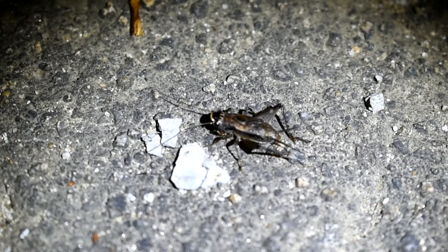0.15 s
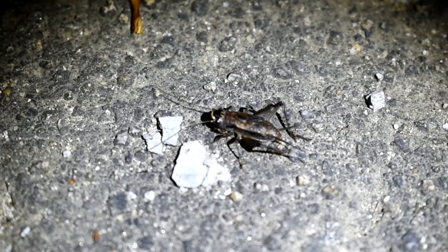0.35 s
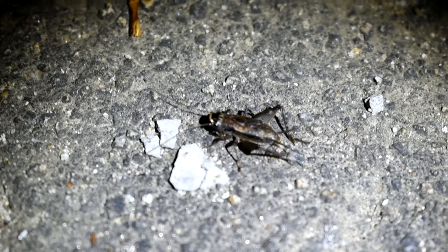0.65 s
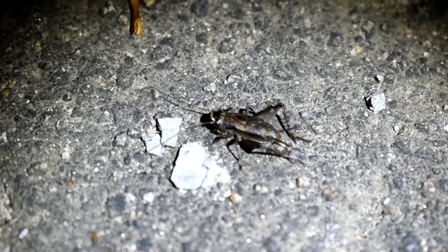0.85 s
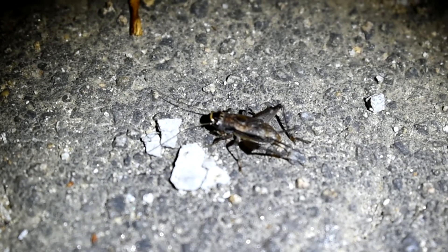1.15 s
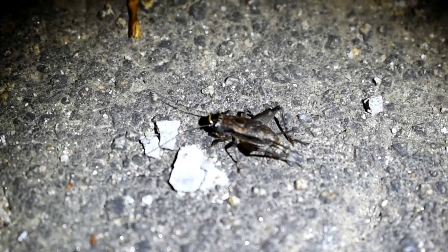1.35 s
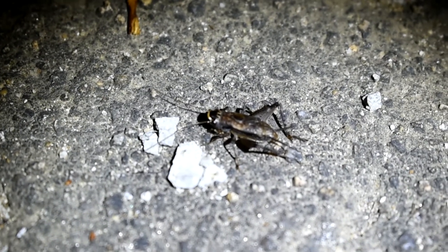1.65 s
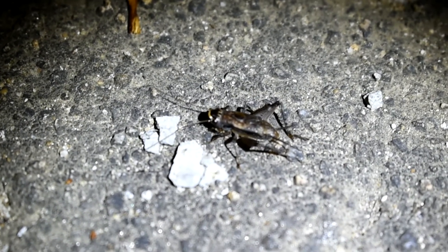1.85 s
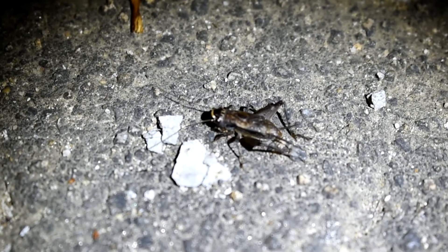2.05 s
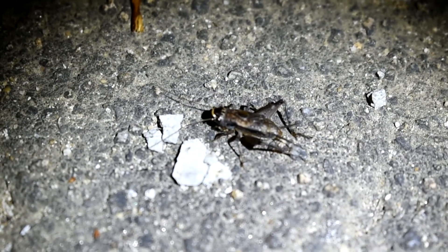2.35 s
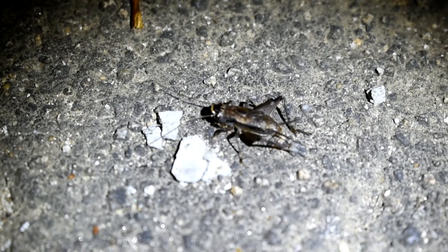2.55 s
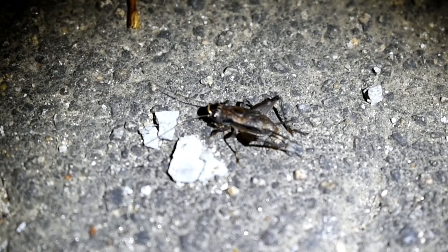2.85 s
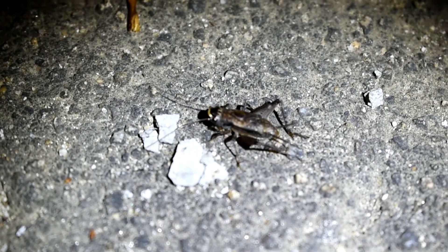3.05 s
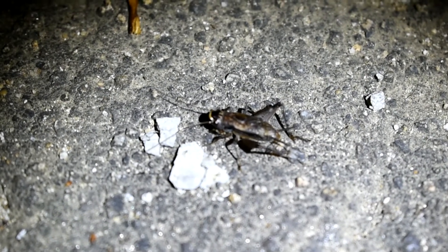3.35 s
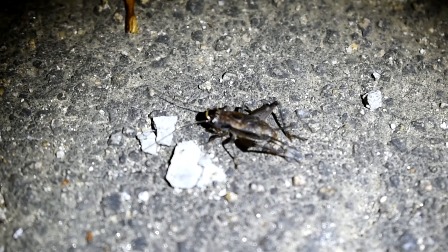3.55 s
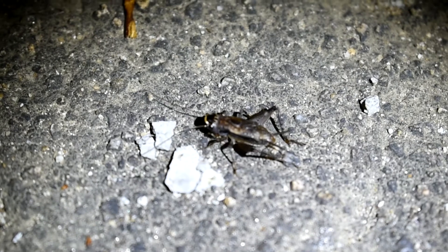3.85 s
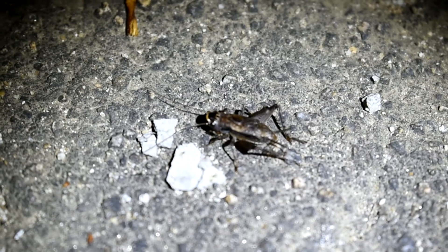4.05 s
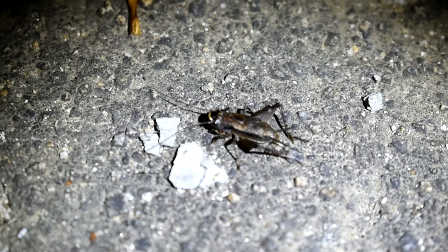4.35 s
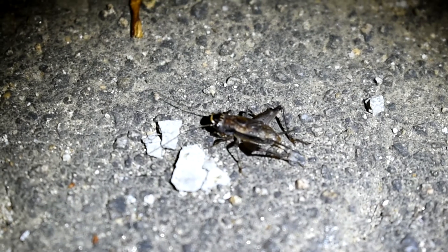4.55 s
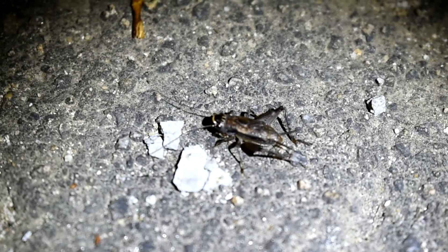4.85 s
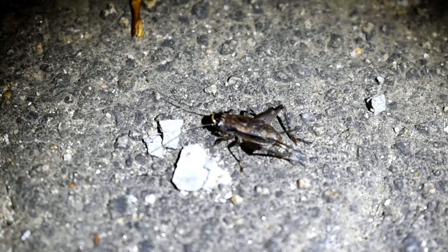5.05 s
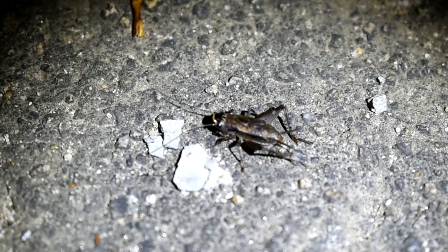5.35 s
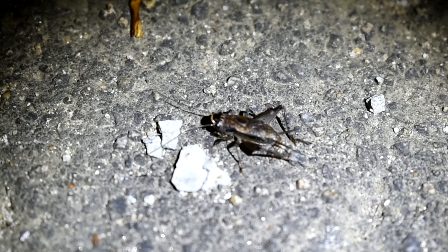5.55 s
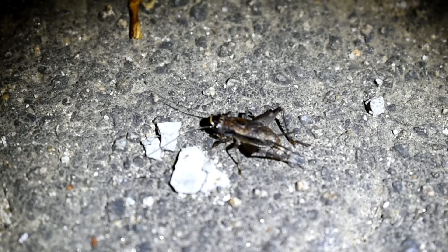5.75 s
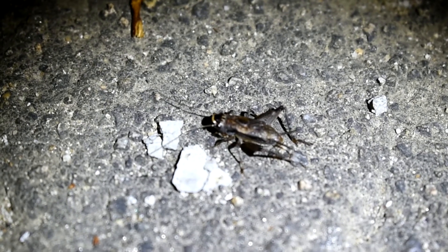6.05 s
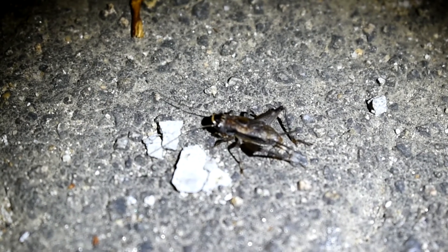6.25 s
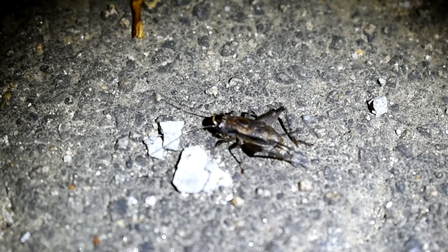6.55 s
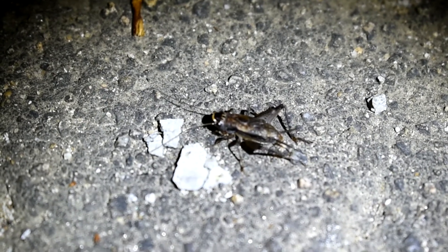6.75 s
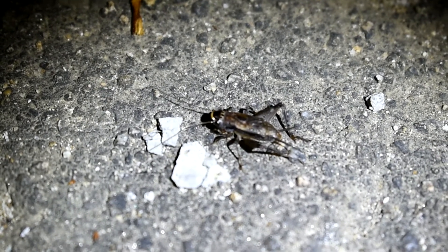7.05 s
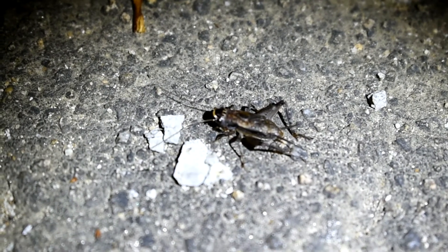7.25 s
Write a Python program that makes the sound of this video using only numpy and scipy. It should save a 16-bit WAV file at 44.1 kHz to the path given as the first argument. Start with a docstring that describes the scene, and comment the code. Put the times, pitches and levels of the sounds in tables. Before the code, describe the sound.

Night outdoors, stereo and thin in the bass. One near cricket dominates with fast, piercing, scratchy chirps, first in even pulses, then in uneven groups of two or three, tightly echoed by ground and wall. Between its three passages, two faint far crickets pulse steadily, mostly left, very high insect buzzes flicker, and one light crack sounds. Soft road noise fades, then rises after the last trill.

```python
"""Night on concrete near a wall. From the start a cricket sings, heard over fixed echoes: each wing stroke is
a falling tone with overtones and a scrape. Two far crickets pulse evenly, tyres and the night are shaped hiss.
The song stops at 0.4 s; katydid buzzes (tooth strikes ringing a broad mode) and a crack of noise at 1.9 s follow.
It returns at 2.0-3.9 s and 4.9-6.7 s, with more buzzes around 4-5 s between and over the songs.
The traffic, softest near 4.2 s, swells to the end."""
import sys
import numpy as np
from scipy import signal
from scipy.fft import rfft, irfft
from scipy.io import wavfile

SR = 44100
rng = np.random.default_rng(int(sys.argv[2]) if len(sys.argv) > 2 else 0)


def log_audio(samples):
    """Write samples as a 16-bit WAV file to the path given in sys.argv[1]."""
    # one column per channel
    frames = np.atleast_2d(samples).T
    # limit to full scale, then quantise
    limited = np.clip(frames, -1, 1)
    pcm = np.round(limited * 32767).astype(np.int16)
    wavfile.write(sys.argv[1], SR, pcm)


N = 327222
TIME = np.arange(N) / SR   # s


def from_db(db):
    """Turn dB into a gain."""
    return 10 ** (np.asarray(db) / 20)


def rms_one(x):
    """Scale to an average (rms) strength of 1."""
    return x / np.sqrt(np.mean(x ** 2) + 1e-20)


def at_hz(points, hz, axis=1):
    """Read a spectrum table between its points, on a log-frequency axis."""
    points = np.array(points)
    return np.interp(np.log(hz + 1), np.log(points[:, 0]), points[:, axis])


def at_time(points):
    """Read a table of levels (dB) at every sample, along straight lines between its points."""
    return np.interp(TIME, *np.transpose(points))


def sides(pan_db):
    """Left and right gains for a level difference: half up on one side, half down on the other."""
    return from_db(np.multiply.outer([0.5, -0.5], pan_db))


def noise(spectrum, pan=((1, 0), (2, 0)), channels=2):
    """Hiss shaped by a spectrum, unrelated in each channel; rms 1 over all channels."""
    hz = np.fft.rfftfreq(N, 1 / SR)
    shape = from_db(at_hz(spectrum, hz)) * sides(at_hz(pan, hz))[:channels]
    white = rng.standard_normal((channels, N))
    return rms_one(irfft(rfft(white) * shape, N))


def filtered(x, order, hz, kind):
    """Keep only the low, the high or a band of frequencies, with a smooth (Butterworth) edge."""
    return signal.sosfilt(signal.butter(order, hz, kind, fs=SR, output="sos"), x)


def resonance(x, hz, width_hz):
    """One mode that x sets ringing; the wider it is, the sooner it dies."""
    r = np.exp(-np.pi * width_hz / SR)
    feedback = [1, -2 * r * np.cos(2 * np.pi * hz / SR), r * r]
    return signal.lfilter([1, 0, -1], feedback, x + 1e-18)


def pulses(per_s, spread_db):
    """An evenly spaced click train with uneven strengths."""
    clicks = np.diff(np.floor(TIME * per_s), prepend=0)
    return clicks * from_db(spread_db * rng.standard_normal(N))


def hump(share, roundness):
    """Rises from 0 to 1 and falls back while share runs from 0 to 1."""
    return np.abs(np.sin(np.pi * np.clip(share, 0, 1))) ** roundness


def cricket():
    """A scraper slows along a toothed file, so each stroke falls in pitch; returns fundamental and upper sound."""
    # wing strokes before the echoes: start t/s, length/s, top pitch f/Hz, level/dB
    strokes = [(-0.021, 0.045, 3890, -29), (0.0227, .031, 3810, -22.5), (0.0659, 0.037, 3846, -21.5),
               (0.1633, 0.028, 3813, -26.5), (.2012, 0.04, 3855, -22.5), (.3142, 0.029, 3776, -28),
               (0.354, 0.032, 3815, -25), (0.398, 0.035, 3750, -23), (2.0273, 0.04, 3452, -35),
               (2.077, .021, 3567, -32.5), (2.15, 0.04, 3698, -31.5), (2.2237, 0.043, 3876, -24.5),
               (2.2974, 0.052, 3947, -21), (2.3745, .05, 3960, -20.5), (2.4504, 0.052, 3990, -20),
               (2.5237, .054, 4000, -20), (2.601, .053, 3995, -20.5), (2.6748, 0.051, 3955, -20),
               (2.7577, .024, 3900, -26.5), (2.796, .036, 3910, -23.5), (2.8433, 0.027, 3883, -21.5),
               (2.882, 0.043, 3880, -21), (2.97, 0.027, 3843, -27), (3.0086, 0.035, 3900, -22.5),
               (3.053, 0.04, 3877, -21.5), (3.146, 0.028, 3837, -25.5), (3.1874, 0.028, 3852, -21.5),
               (3.2304, 0.038, 3840, -21), (3.322, 0.027, 3840, -25.5), (3.3613, 0.034, 3880, -22.5),
               (3.4101, .0381, 3880, -21.5), (3.513, 0.029, 3765, -28), (3.551, 0.041, 3850, -22),
               (3.6584, 0.032, 3782, -27), (3.6956, 0.041, 3836, -22), (3.8197, 0.033, 3726, -28.5),
               (3.8613, .034, 3823, -23.5), (3.9062, 0.036, 3740, -24), (4.9063, 0.041, 3546, -32),
               (4.955, 0.031, 3564, -29), (5.0432, .038, 3744, -30), (5.117, 0.046, 3920, -24),
               (5.191, .048, 3980, -20.5), (5.264, 0.053, 3975, -20.5), (5.3383, .053, 3980, -20),
               (5.4136, .051, 3986, -20), (5.488, 0.05, 3960, -20.5), (5.56, 0.055, 3978, -20.5),
               (5.6576, 0.022, 3906, -28.5), (5.696, 0.028, 3848, -23), (5.7368, .033, 3860, -22.5),
               (5.783, 0.031, 3894, -21.5), (5.8335, 0.027, 3830, -21), (5.8751, 0.043, 3893, -21.5),
               (5.9729, 0.022, 3806, -24.5), (6.009, 0.039, 3870, -22.4), (6.0615, 0.03, 3836, -21.5),
               (6.1053, .037, 3876, -22), (6.203, 0.035, 3802, -30), (6.2458, 0.033, 3865, -23),
               (6.2886, 0.038, 3840, -23), (6.397, 0.028, 3714, -28), (6.4378, 0.032, 3774, -23),
               (6.482, 0.037, 3780, -22.5), (6.6013, 0.034, 3710, -28.6), (6.646, 0.039, 3795, -23.5)]
    # overtones as the wings radiate them, against the fundamental: f/Hz, left level/dB, right level/dB
    overtones = [(6200, -22, -30.5), (7140, -21, -18.5), (7560, -13.5, -22), (8160, -28.5, -25),
                 (9980, -42, -31), (10576, -18.5, -21), (11150, -35, -9.5), (11167, -12.5, -13),
                 (11770, -25, -28.5), (13200, -24.5, -24), (14050, -30.5, -28.5), (14400, -22.5, -51),
                 (15200, -41, -58), (16500, -53, -36)]
    # colour of the file on the scraper: f/Hz, relative level/dB
    rasp_colour = [(2500, -35.5), (3600, -1.5), (4400, -5.5), (4800, -5), (5200, -5), (5700, -25.5),
                   (6300, -13), (7500, -18.5), (9000, -12.5), (11000, -15), (14000, -7), (16000, -16.5)]
    # overtones from the second up: level change along the stroke/(dB per s), negative fades;
    # how much weak strokes favour it (power)
    orders = [(-200, 0.87), (28, 0.18), (24, 0.66)]
    firm_db = -19   # level of a firm stroke
    end_hz, sag_hz_per_s = 3196, 18540   # lowest end pitch; short strokes stop before it, at this average fall
    top_s = 0.00823   # time to reach top pitch
    bend, bend_per_s = 1.36, 4.13   # curve of the fall, rounder for long strokes
    flick_hz, flick_s = 200, 0.0017   # sharp opening of a firm stroke and how fast it dies away
    wobble_rad = 0.048   # phase spread that uneven teeth give a firm stroke
    rasp_db, catch_db, catch_s = -37, -26, 0.0011   # scrape under the tone, and the catch that opens a stroke

    low, upper = np.zeros(N), np.zeros((2, N))
    scrape = noise(rasp_colour, channels=1)[0]
    teeth = rms_one(filtered(rng.standard_normal(N), 2, [60, 476], "band"))
    for start, length, top, level_db in strokes:
        at = np.arange(max(round(start * SR), 0), round((start + length) * SR))
        share = np.abs(at / SR - start) / length
        since = share * length   # s
        weak = from_db(firm_db - level_db)   # weak strokes slip, scrape and ring their overtones more

        fall = min(top - end_hz, sag_hz_per_s * length)
        curve = np.abs((since - top_s) / (length - top_s)) ** (bend + bend_per_s * length)
        flick = flick_hz / weak ** 2 * np.exp(-since / flick_s)   # strong strokes open a little sharper
        pitch = top - fall * curve + flick
        phase = 2 * np.pi * np.cumsum(pitch) / SR
        low[at] += from_db(level_db) * hump(share, 0.81) * np.sin(phase)

        # the scrape comes in uneven grains, different from stroke to stroke
        grit = from_db(4.6 * rng.standard_normal() + 2.8 * teeth[at])
        steady = from_db(rasp_db) * grit * weak ** 1.17 * hump(share ** 0.89, 0.59)
        catch = from_db(catch_db) * weak ** 0.61 * since / catch_s * np.exp(1 - since / catch_s)
        rasp = scrape[at] * (steady + catch)

        swell = hump(share, 0.29)
        uneven_phase = phase + wobble_rad * weak ** 0.25 * teeth[at]
        for side in range(2):
            tones = 0
            for k, (change_db, favour) in enumerate(orders, 2):
                tone_db = at_hz(overtones, k * pitch, axis=side + 1) + change_db * since
                tones = tones + from_db(tone_db) * weak ** favour * np.sin(k * uneven_phase)
            upper[side, at] += from_db(level_db) * (swell * tones + rasp)
    return low[None], upper


def yard(sent, left, right, tail_db):
    """Sound arrives over single paths, then in two noise-like tails: dense reflections that die away."""
    near_db, near_t60_s = -16, 0.3   # dense near tail, time to fall 60 dB
    far_db, far_t60_s = -35, 0.88   # faint long tail
    t = np.arange(SR) / SR
    near = from_db(near_db - 60 * t / near_t60_s) / np.sqrt(near_t60_s)
    far = from_db(far_db - 60 * t / far_t60_s) / np.sqrt(far_t60_s)
    gain = from_db(tail_db) * np.sqrt(6 * np.log(10) / SR)
    response = rng.standard_normal((2, SR)) * (near + far) * gain * (t > 0.012)
    for side, paths in enumerate((left, right)):
        for delay_ms, level_db in paths:
            # sinc places the echo between samples
            response[side, :2000] += from_db(level_db) * np.sinc(np.arange(2000) - delay_ms * SR / 1000)
    heard = signal.fftconvolve(sent, response, axes=1)[:, :N]
    return filtered(heard, 4, 2200, "high")   # small wings radiate no bass


def singer():
    """The near cricket over ground and wall; short waves beam and scatter differently, so have their own paths."""
    # paths of the fundamental: delay t/ms, level/dB
    low_left = [(0.31, -14.5), (1.47, -5), (2.34, -13), (3.19, -2), (4.87, -1.2), (6.53, -9.5),
                (8.61, -8.5), (10.62, -6), (12.21, -1.5), (16.64, -8.5), (18.35, -7), (20.46, -29.5),
                (26.02, -10), (28.36, -15.5), (38.92, -13.5), (42.85, -32)]
    low_right = [(0.12, -26), (1.0, 3.5), (1.6, -25.5), (3.0, -8.5), (3.33, -15.5), (7.87, -15),
                 (11.51, -11.5), (13.81, -15), (16.58, -11), (20.13, -10), (22.13, -14), (23.55, -25),
                 (25.54, -18.5), (29.02, -17.5), (32.14, -25.5), (37.61, -18.5)]
    # paths of overtones and scrape: delay t/ms, level/dB
    treble_left = [(1.4, -9.5), (4.6, -11), (7.9, 0.5), (9.3, -1.5), (10.8, -19.5), (13.5, -6), (15.8, -18),
                   (19, -6), (27, -7)]
    treble_right = [(1.0, 4), (2.3, 0), (6.0, -26), (10.5, -8), (12, -7), (17, -19)]
    low, upper = cricket()
    return yard(low, low_left, low_right, tail_db=2.5) + yard(upper, treble_left, treble_right, tail_db=5.5)


def neighbours():
    """Far crickets: short pulses ring a mode in nearly steady chirps, uneven, blurred and smeared by distance."""
    # voices: pitch f/Hz, width of each first mode f/Hz, pulses per s, average level/dB, left-right level/dB
    voices = [(4868, 260, 87, -67, 10.5), (3600, 300, 49, -72, 12.5)]
    # pace: start of a reference chirp t/s, period/s, quickening/(1/s), chirp length/s
    paces = [(.527, .195, .0043, .12), (.51, .2578, 0, .155)]
    out = 0
    smear = rng.standard_normal((2, 4000)) * from_db(-60 * np.arange(4000) / SR / 0.15)
    for (first, period, quicken, length), (hz, width_hz, per_s, level_db, pan_db) in zip(paces, voices):
        since = TIME - first
        count = since / period * (1 + quicken * since) + 10   # +10 keeps the chirp number positive
        strength = from_db(1.2 * rng.standard_normal(80))[count.astype(int)]
        chirps = hump(count % 1 * period / length, roundness=0.3) * strength
        drive = chirps * (rms_one(pulses(per_s, spread_db=5.0)) + 1.18 * rng.standard_normal(N))
        tone = resonance(resonance(drive, hz, width_hz), hz, 1.6 * width_hz)
        heard = tone + 0.041 * signal.fftconvolve(tone[None], smear, axes=1)[:, :N]
        even = heard / heard.std(axis=1, keepdims=True)
        out = out + from_db(level_db) * sides(pan_db)[:, None] * even
    return out


def traffic():
    """Tyres on a road make a broad hiss, here shaped noise that surges unevenly."""
    # slow loudness of the traffic: t/s, level/dB
    loudness = [(0.0, -54), (0.6, -57.5), (1.57, -60.5), (3.78, -61.5), (4.21, -66.5), (5.06, -62.5),
                (5.93, -53), (7.42, -49.5)]
    # colour of the tyres: f/Hz, relative level/dB
    colour = [(35, -82), (60, -52), (113, -44), (232, -25), (273, -29.5), (387, -24), (445, -30.5),
              (875, -10), (1400, -3), (3540, -2.5), (4800, 0.5), (11400, -5), (15800, -6.5)]
    # side of the tyres: f/Hz, left-right level/dB
    pan = [(60, 2), (180, -12), (550, 14), (1650, 8.5), (4970, 8), (15000, 2.5)]
    surge_db = 1.0 * rms_one(filtered(rng.standard_normal(N), 2, 5.8, "low"))
    return from_db(at_time(loudness) + surge_db) * noise(colour, pan)


def night_hiss():
    """The quiet background is shaped noise whose level drifts slowly."""
    # slow loudness of the hiss: t/s, level/dB
    loudness = [(0, -55.5), (.8, -58), (1.8, -58), (4.1, -58.5), (4.8, -58), (7.42, -60.5)]
    # colour of the hiss: f/Hz, relative level/dB
    colour = [(40, -47), (120, -51), (300, -27.5), (700, -15.5), (1400, -11.5), (2000, -16.5),
              (3000, -30.5), (3600, -13.5), (5000, -17), (7500, -13.5), (9400, -20.5), (12800, -10),
              (15800, -14)]
    # side of the hiss: f/Hz, left-right level/dB
    pan = [(60, -6.5), (180, 12.5), (550, 5.5), (1650, 2.5), (4970, 14.5), (15000, 0)]
    return from_db(at_time(loudness)) * noise(colour, pan)


def katydid():
    """Fast, evenly timed tooth strikes ring a broad high mode, which makes a buzz."""
    # buzzes: start t/s, length/s, pitch f/Hz, width of each of two modes f/Hz, level/dB, left-right level/dB
    buzzes = [(.67, 0.36, 12400, 696, -65, 8), (.92, .14, 10700, 1500, -66, 2),
              (1.6, 0.32, 10500, 1500, -69, 0), (1.84, 0.17, 12100, 890, -68, 1),
              (2.006, 0.047, 12700, 700, -55, 5), (3.992, 0.57, 12500, 1170, -77, -23),
              (4.593, 0.15, 10700, 1220, -69.5, 4), (4.886, 0.055, 13000, 890, -60, 4)]
    out, strikes = 0, pulses(per_s=301, spread_db=-2.5)
    for start, length, hz, width_hz, level_db, pan_db in buzzes:
        tone = rms_one(resonance(resonance(strikes, hz, width_hz), hz, width_hz))
        swell = hump((TIME - start) / length, roundness=0.33)
        out = out + from_db(level_db) * sides(pan_db)[:, None] * swell * tone
    return out


def snap():
    """A dry snap nearby: bright noise starts at once and dies away, as a crack and its scatter off the ground."""
    # snaps: t/s, starting level before the bass cut/dB
    snaps = [(1.936, -41)]
    t60_s = 0.14   # time to fall 60 dB
    colour = [(300, -60), (1500, -13), (4000, 10.5), (9000, 5.5), (12500, 11), (16000, 0)]   # Hz, dB
    bright = noise(colour, pan=[(1000, 4.7), (10000, 7.8)])
    loudness = 0
    for start, level_db in snaps:
        loudness = loudness + from_db(level_db - 60 * np.abs(TIME - start) / t60_s) * (TIME >= start)
    return filtered(loudness * bright, 4, 1200, "high")


def scene():
    """Add up the singer in its echoes, far insects, traffic, night hiss and snap."""
    return singer() + neighbours() + traffic() + night_hiss() + katydid() + snap()


def record(dry):
    """The microphone drops the bass; the top is cut steeply."""
    thin = filtered(dry, 2, 240, "high")
    steep = signal.ellip(12, 0.3, 70, 15720, fs=SR, output="sos")   # order, ripple dB, depth dB, edge Hz
    return signal.sosfilt(steep, thin)


dry = scene()
out = record(dry)
log_audio(out)
```